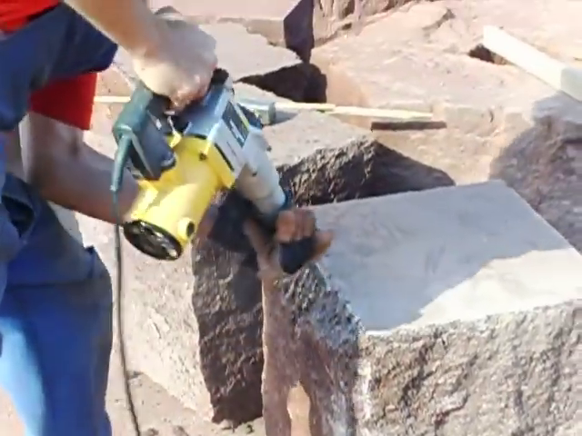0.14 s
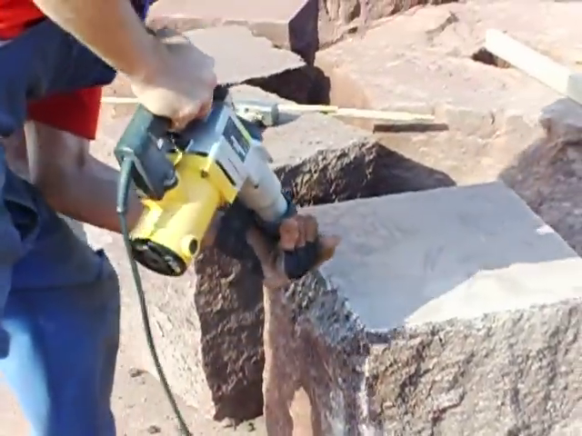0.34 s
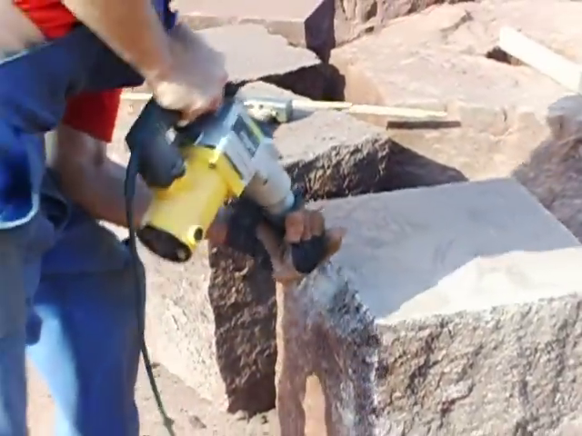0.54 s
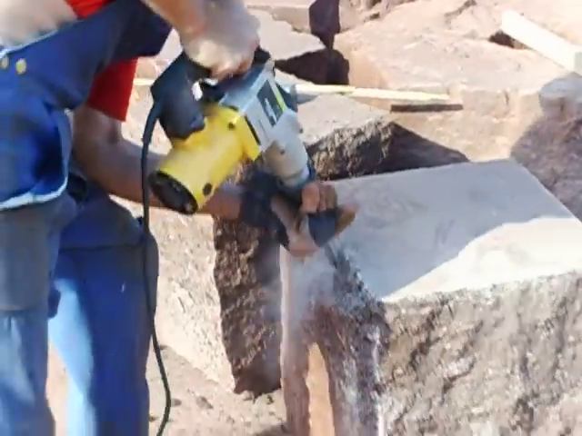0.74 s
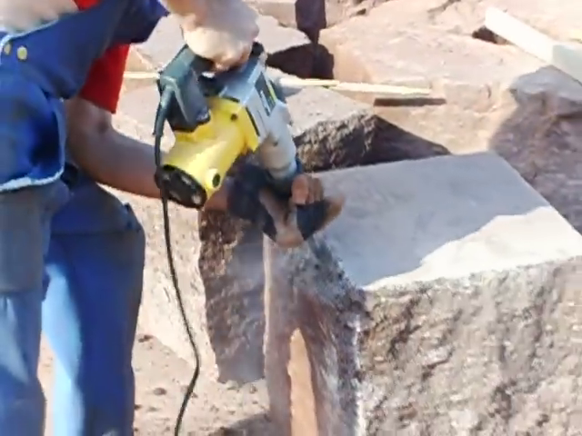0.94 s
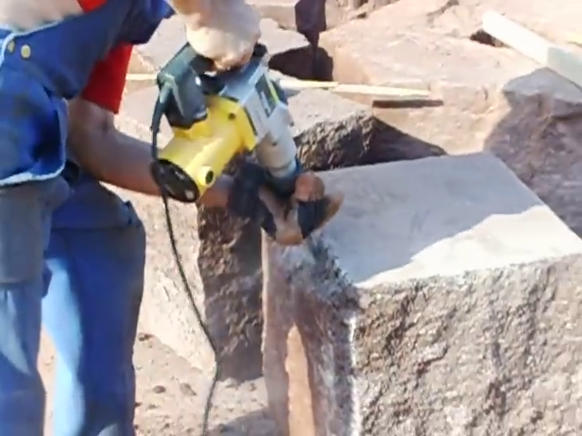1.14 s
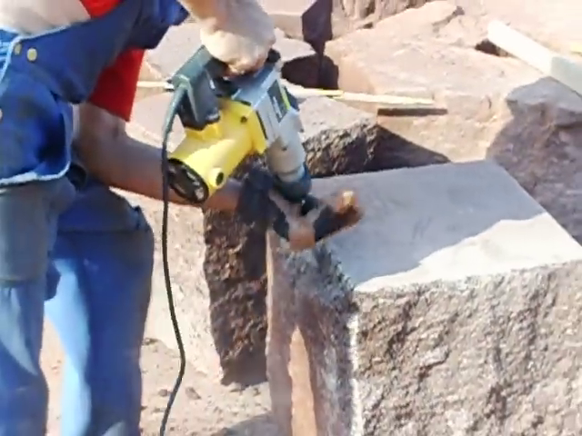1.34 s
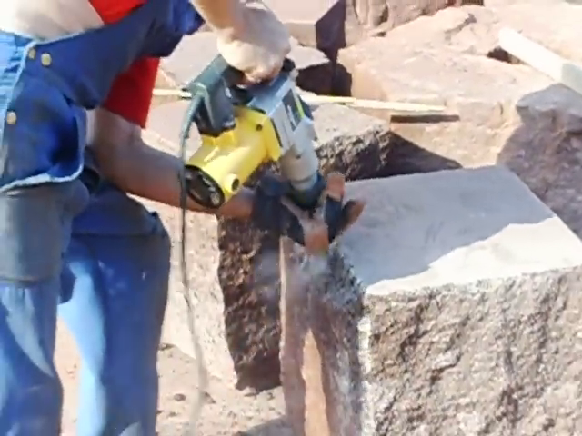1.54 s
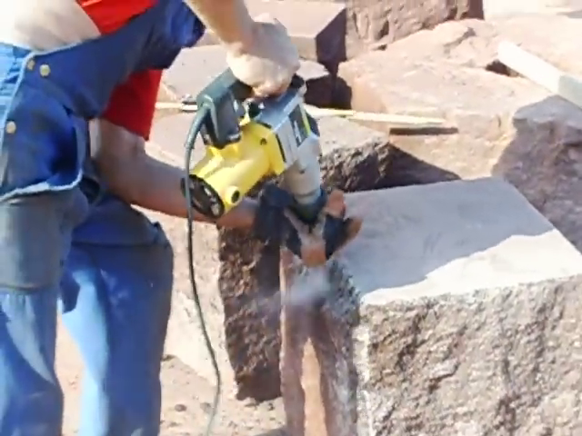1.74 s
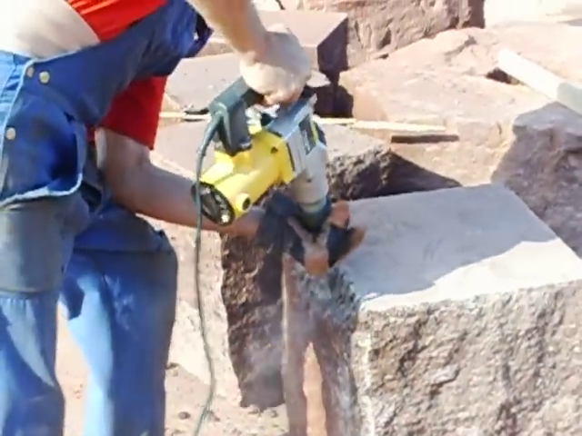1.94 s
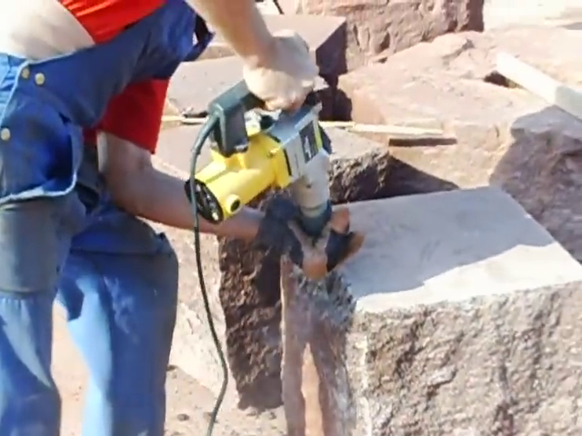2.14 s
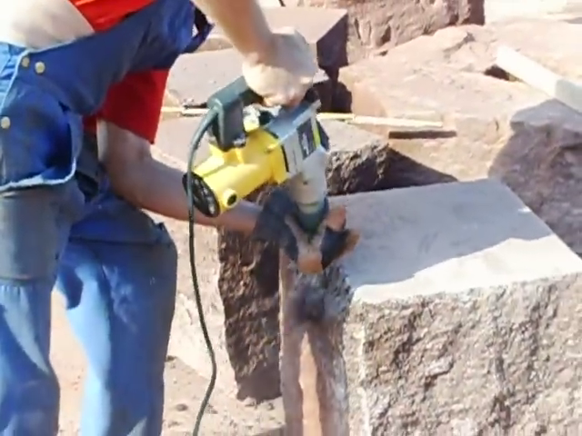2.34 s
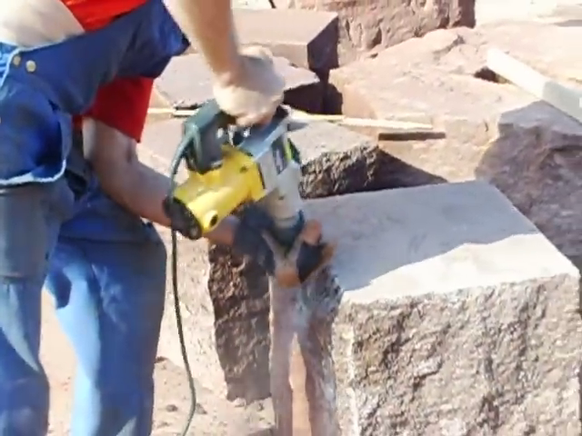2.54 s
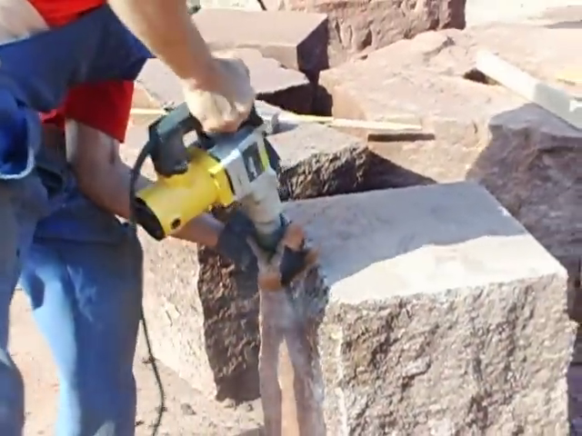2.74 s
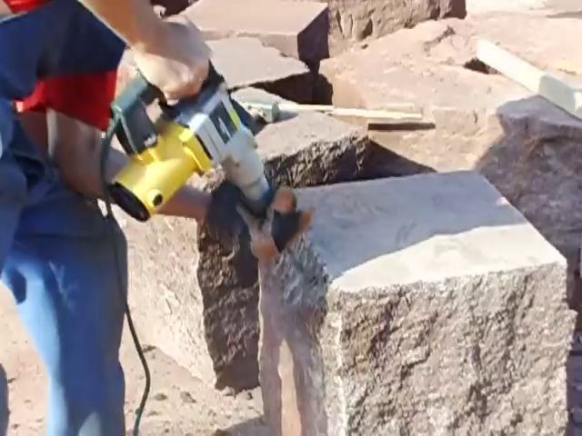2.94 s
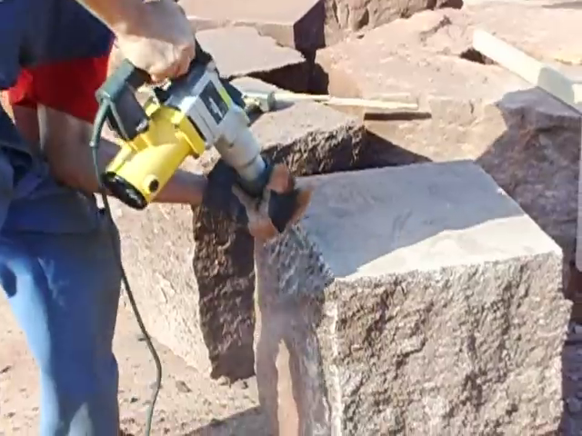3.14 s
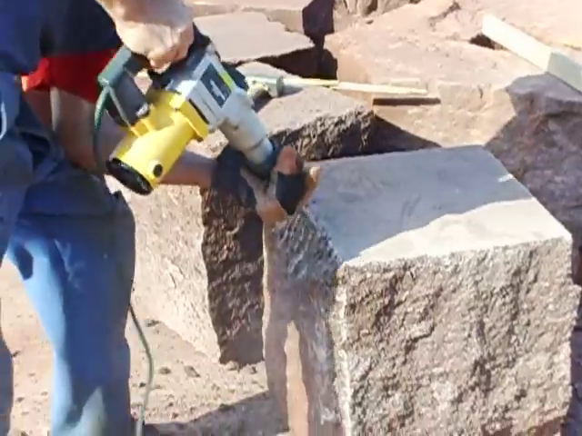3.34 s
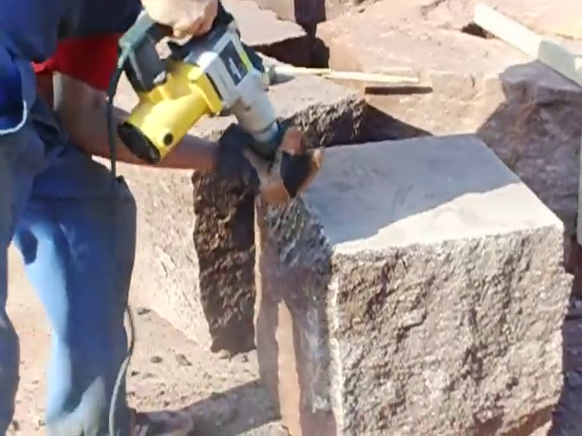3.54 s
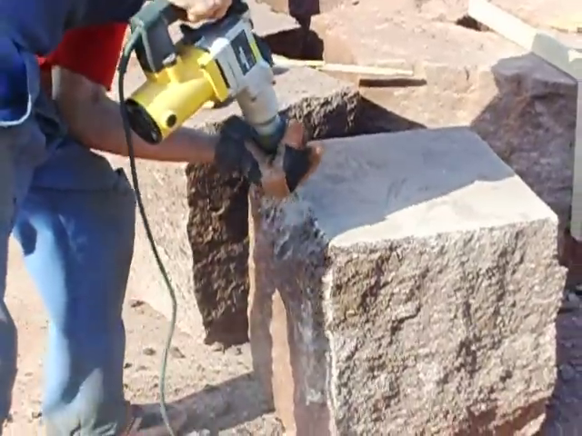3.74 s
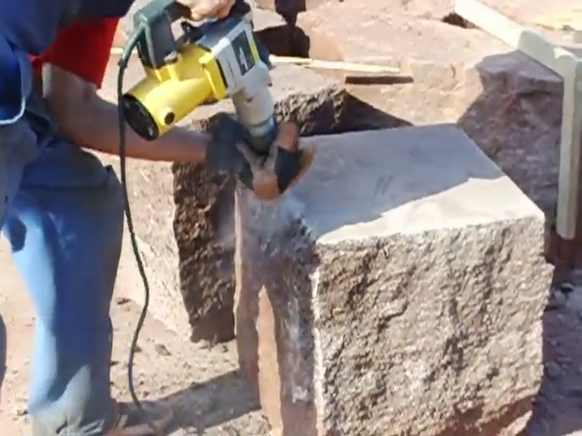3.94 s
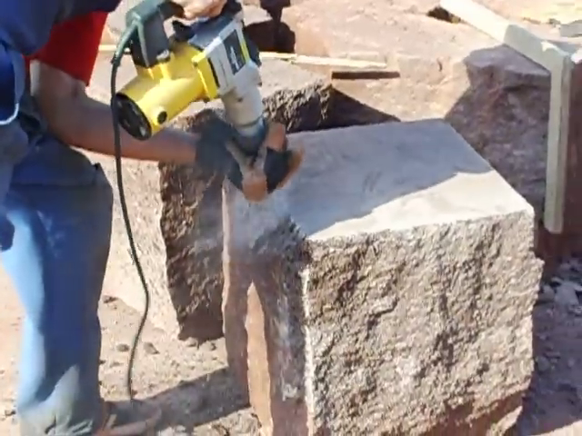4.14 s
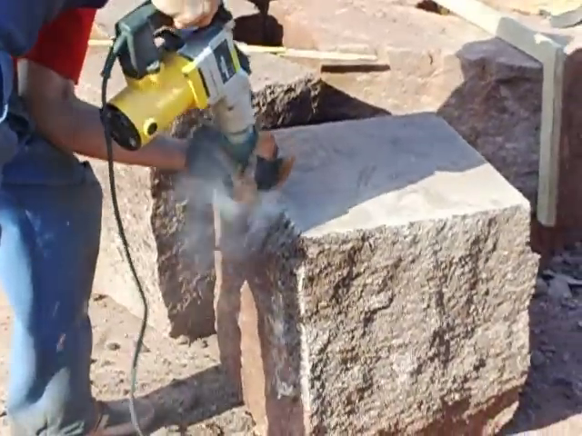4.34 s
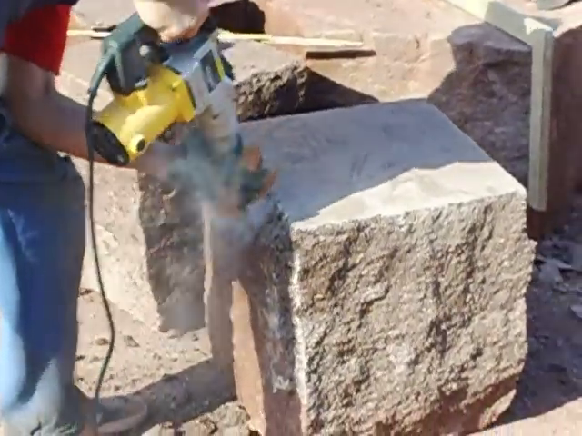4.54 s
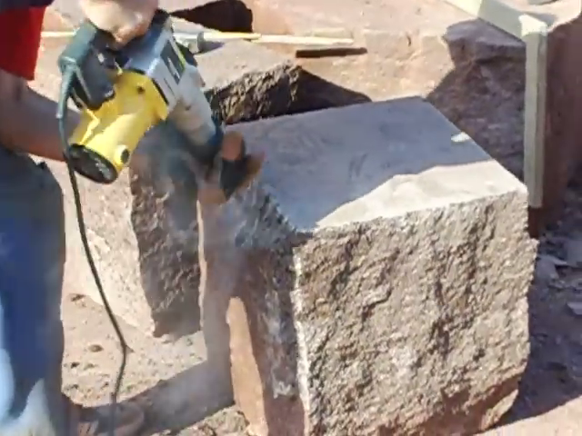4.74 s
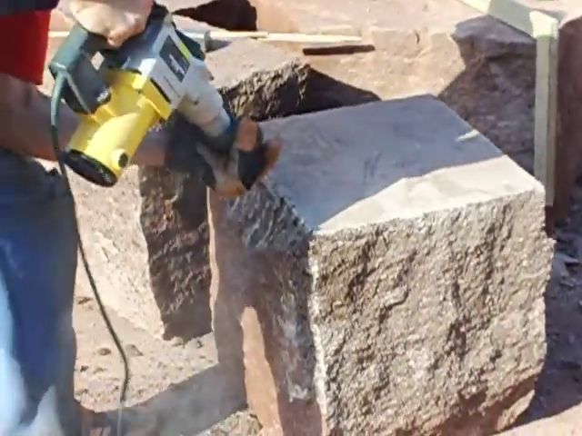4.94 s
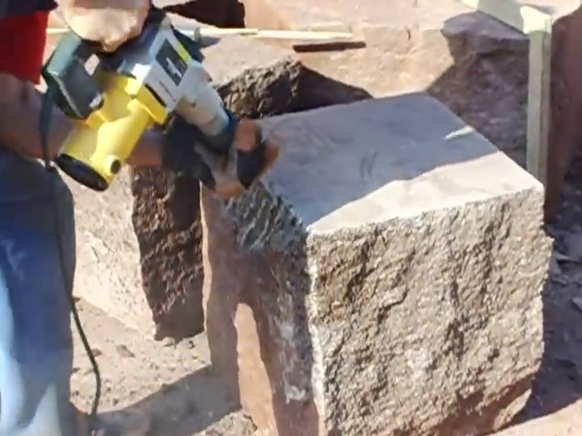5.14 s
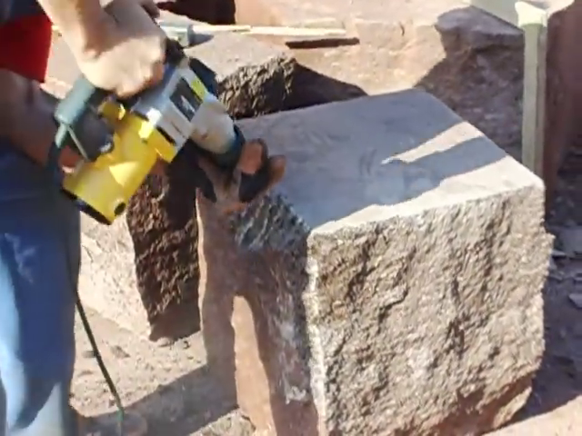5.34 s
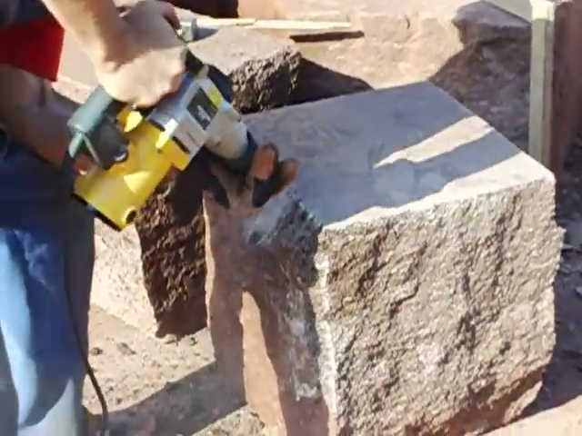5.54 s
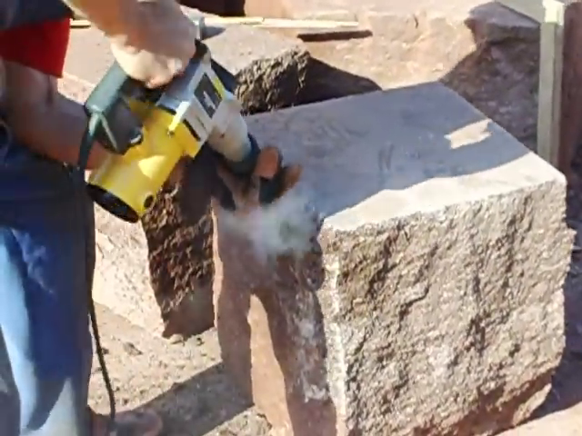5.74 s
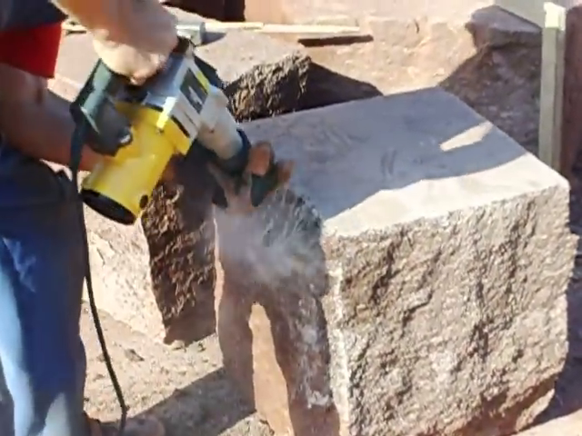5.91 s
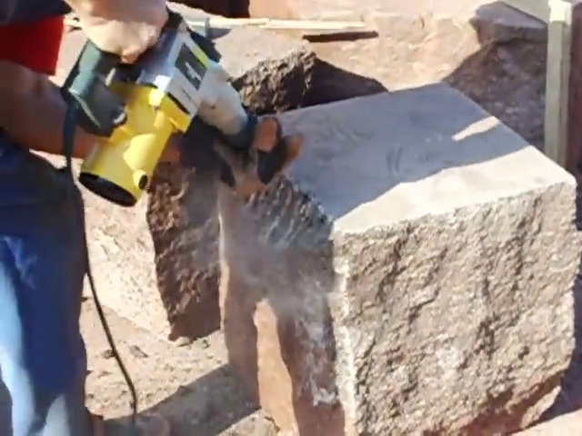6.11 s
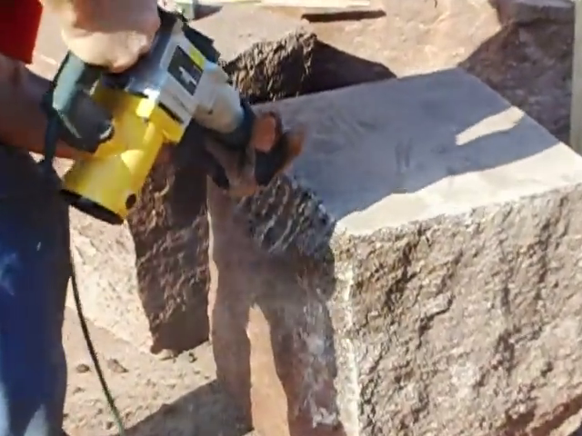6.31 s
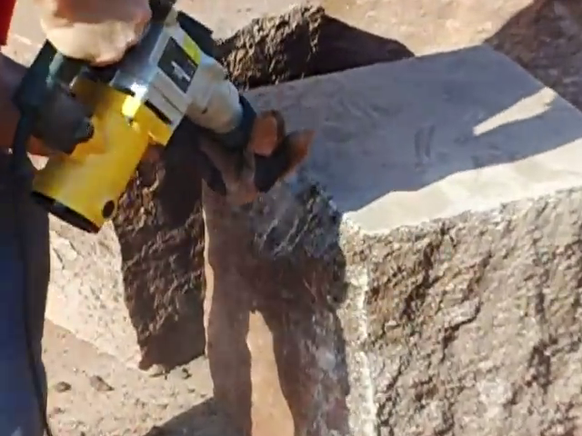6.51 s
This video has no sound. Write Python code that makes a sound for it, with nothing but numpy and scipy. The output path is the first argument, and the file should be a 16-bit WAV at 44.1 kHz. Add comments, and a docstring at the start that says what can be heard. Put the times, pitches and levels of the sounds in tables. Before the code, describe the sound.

Loud buzzing bursts of an electric chisel hammer pounding a stone block outdoors, alternating with the metallic rattle of its coasting motor.

```python
"""A loose chisel and gears rattle as the motor of a corded electric hammer winds down, close by.
Then the pointed chisel is driven into a stone block in four runs: the striker hits about 61 times
a second, the steel bounces and crushes grit, the housing shakes and a few flakes crack off.
Between runs the motor coasts and the rattle goes on. The blows overload the microphone.
Around it lies an open stone yard with a faint drone and a light breeze."""
import sys
import numpy as np
from scipy import signal
from scipy.fft import rfft, irfft, next_fast_len
from scipy.io import wavfile

SR = 44100
rng = np.random.default_rng(int(sys.argv[2]) if len(sys.argv) > 2 else 0)


def master(y):
    """Save y as 16-bit WAV."""
    cut = np.clip(np.atleast_2d(y).T, -1, 1)
    pcm = np.round(cut * 32767)  # scale
    wavfile.write(sys.argv[1], SR, pcm.astype(np.int16))


N = 289737
TIME = np.arange(N) / SR
PADDED = next_fast_len(N + SR // 4)
BINS_HZ = np.maximum(np.arange(PADDED // 2 + 1) * SR / PADDED, 1)
WORKING_SPEED = 61   # blows per second
MIC_TOP_HZ, RELEASE_S = 10970, .025


def from_db(db):
    """Decibels to gain."""
    return 10 ** (np.asarray(db) / 20)


def rms_one(x):
    """Scale to unit rms."""
    return x / np.sqrt(np.mean(x ** 2) + 1e-20)


def drift(rate):
    """A random wander of unit rms, with `rate` new values a second."""
    knots = rng.standard_normal(int(N / SR * rate) + 2)
    return rms_one(np.interp(TIME * rate, np.arange(len(knots)), knots))


def gate(start, end, attack_s, release_s):
    """Rise, hold at 1, fall."""
    return np.clip(np.minimum((TIME - start) / attack_s, (end - TIME) / release_s), 0, 1)


def swells(rows):
    """A bell-shaped rise in dB for each row."""
    return sum(db * np.exp(-((TIME - s) / half_s) ** 2) for s, half_s, db in rows)


def by_speed(speed, db_per_octave):
    """Gain of a part that gets louder with speed; 1 at working speed."""
    return from_db(db_per_octave * np.log2(speed / WORKING_SPEED))


def coloured(x, colour):
    """An EQ curve that runs in straight lines over log frequency."""
    hz, db = np.transpose(colour)
    gain = from_db(np.interp(np.log(BINS_HZ), np.log(hz), db))
    return irfft(rfft(x, PADDED) * gain, PADDED)[:N]


def ring(x, hz, width_hz):
    """One resonance with gain 1 at its peak."""
    r = np.exp(-np.pi * width_hz / SR)
    feedback = [1, -2 * r * np.cos(2 * np.pi * hz / SR), r * r]
    return signal.lfilter(np.array([1, 0, -1]) * (1 - r * r) / 2, feedback, x + 1e-18)


def clicks_at(times, sizes):
    """A train of single clicks."""
    return np.bincount(np.clip(np.round(times * SR).astype(int), 0, N - 1), sizes, N)


def crunch(clicks, decay_s):
    """Each click becomes a short dying burst of noise with the same energy."""
    r = np.exp(-2 / (decay_s * SR))
    energy = signal.lfilter([1 - r], [1, -r], clicks ** 2 + 1e-18)
    return np.sqrt(energy) * rng.standard_normal(N)


def along_steel(x, lag_s):
    """Bending waves turn a click into a falling chirp: top first, two octaves lower lag_s later."""
    cycles = lag_s * (2 * np.sqrt(BINS_HZ * MIC_TOP_HZ) - BINS_HZ)
    return irfft(rfft(x, PADDED) * np.exp(-2j * np.pi * cycles), PADDED)[:N]


# Power to the motor. Each row: on and off in seconds, target speed in blows per second.
# In the second row the pressure eases and the motor races.
POWER_ON = [(.445, 2.529, 61.06), (2.529, 2.721, 67.63), (3.6006, 4.4776, 61.14), (5.3353, 5.768, 60.45)]

def crank_speed(first_speed=54.06, spin_up_s=.1489, coast_s=1.7555):
    """Blows per second: the motor runs up quickly under power and coasts down slowly without it."""
    speed = first_speed * np.exp(-TIME / coast_s)
    for on, off, target in POWER_ON:
        powered_s = np.clip(TIME, on, off) - on
        driven = target + (np.interp(on, TIME, speed) - target) * np.exp(-powered_s / spin_up_s)
        coasting = np.exp(-np.maximum(TIME - off, 0) / coast_s)
        speed = np.where(TIME > on, driven * coasting, speed)
    return speed


# The bright, metallic EQ of the clatter. Each row: frequency in Hz, gain in dB.
RATTLE_EQ = [(60, -15.5), (200, -21), (470, -23), (570, -17), (720, -5.5), (950, -13.5), (1350, -9),
             (1850, -1), (2250, -1.5), (3300, 0.5), (4500, -1.5), (6000, -7), (8500, -13.5), (11000, -20)]
# Narrow rings that come and go as the chisel shifts in its holder.
# Each row: pitch in Hz, width in Hz, relative level in dB.
SHIFTING_RINGS = [(1804, 150, -17), (2513, 73, -12.5), (3620, 70, -10.5), (3860, 45, -10)]
# The low and the high ring of the loose chisel. Each row: pitch in Hz, width in Hz.
LOOSE_RINGS = [(2700, 80), (3800, 280)]
# The chisel hangs loose. Each row: start and end in seconds, then trims in dB
# for the clatter, the low ring and the high ring before it fades.
IDLES = [(-.02, .52, -0.5, -24.5, -15), (2.546, 3.624, 0, -28.5, -21), (4.65, 5.42, -0.75, -26, -18.5),
         (5.842, 6.2, 0.5, -23, -26)]
# The chisel shifts and rings out, loose or pressed.
# Each row: centre in seconds, half length in seconds, boost in dB.
RING_SURGES = [(.85, 0.086, 5.5), (1.08, .05, 9.5), (1.77, .08, 9), (2.56, 0.046, 6.5), (3.12, .06, 6),
               (3.35, 0.089, 13), (4.42, 0.018, 7.5), (4.88, 0.094, 4.5), (5.79, .05, 5.5)]

def rattle(turns, speed, touches_per_turn=26, clatter_db=-15.5, shifting_db=-22.5, fade_db_per_s=17):
    """Gears and the loose chisel touch many times a turn, over the rush of the cooling fan."""
    touches = (rng.random(N) < touches_per_turn * speed / SR) * rng.choice([-1, 1], N)
    clicks = touches * from_db(3 * np.clip(rng.standard_normal(N), -2, 2))
    fan = from_db(-1) * rng.standard_normal(N)
    contact = rms_one(along_steel(clicks, lag_s=.0009)) + fan
    # touches bunch up with the crank and by chance
    contact *= from_db(1.18 * np.sin(2 * np.pi * turns) + 1.09 * drift(110))
    # slower touches are softer and lose treble
    soft = signal.sosfiltfilt(signal.butter(2, 5500, fs=SR, output="sos"), contact)
    contact = soft + (contact - soft) * from_db(4 * np.log(speed / speed.mean()))
    out = from_db(clatter_db) * rms_one(coloured(contact, RATTLE_EQ))
    for hz, width, db in SHIFTING_RINGS:
        waver_db = 5 * np.minimum(drift(9), 1)
        out += from_db(shifting_db + db + waver_db) * rms_one(ring(contact, hz, width))
    out *= by_speed(speed, db_per_octave=1.5)
    # off the stone the chisel rings freely; its high ring fades through each pause
    low, high = [rms_one(ring(contact, hz, width)) for hz, width in LOOSE_RINGS]
    for start, end, trim_db, low_db, high_db in IDLES:
        loose = gate(start, end, attack_s=.03, release_s=.03)
        fade_db = fade_db_per_s * np.maximum(TIME - start, 0)
        low_ring = from_db(low_db - 2) * low
        high_ring = from_db(high_db - 4 - fade_db + swells(RING_SURGES)) * high
        out = out * from_db(trim_db * loose) + loose * (low_ring + high_ring)
    return out


def rotor(turns, speed, gear_ratio=5.4, level_db=-38.5, loaded_db=-1.5):
    """The geared rotor sings above the crank, louder at speed and a little softer under load."""
    load = sum(gate(start, end, attack_s, RELEASE_S) for start, end, attack_s, *_ in RUNS)
    level = from_db(level_db + loaded_db * load - 3 * drift(16)) * by_speed(speed, db_per_octave=26.5)
    return np.sqrt(2) * level * np.sin(2 * np.pi * gear_ratio * turns)


# A steady bed of tones in the yard. Each row: pitch in Hz, level in dB.
DRONE_TONES = [(172, -55), (441, -68)]

def drone():
    """Faint tones that hold their pitch and waver in level."""
    return np.sqrt(2) * sum(from_db(db - 3.5 * drift(8)) * np.sin(2 * np.pi * hz * TIME)
                            for hz, db in DRONE_TONES)


# The bass-heavy EQ of the breeze. Each row: frequency in Hz, gain in dB.
WIND_EQ = [(15, -6.5), (35, -4), (70, -12), (150, -28.5), (400, -34)]
# Gusts. Each row: centre in seconds, half length in seconds, boost in dB.
GUSTS = [(.9, .2, 4), (1.9, .25, 7.5), (3.1, .1, 10), (3.95, .25, 4)]

def wind(level_db=-48):
    """A light breeze rumbles on the microphone."""
    return from_db(level_db + swells(GUSTS)) * rms_one(coloured(rng.standard_normal(N), WIND_EQ))


# Hard metal accents in the rattle. Each row: start in seconds, relative level in dB.
CLANKS = [(0.019, -4), (0.08, 0), (0.252, -6), (0.359, -2.5), (0.481, -1.5), (2.922, 2), (3.316, -3),
          (3.36, -6.5), (3.427, -5), (4.79, -11), (4.809, -3), (4.899, 2), (4.978, -7), (5.023, -4),
          (5.233, -5), (5.983, 2.5), (6.041, -4.5)]

def clanks(level_db=14.5):
    """Now and then the loose chisel knocks hard in its holder and rings."""
    starts, db = np.transpose(CLANKS)
    contact = crunch(clicks_at(starts, from_db(db + level_db)), decay_s=.0013)
    return coloured(contact, RATTLE_EQ) + sum(ring(contact, hz, width) for hz, width in LOOSE_RINGS)


# The chisel is pressed to the stone. Each row: start, end and attack in seconds, blow level in dB,
# stone knock trim in dB, hum trim in dB, hum build-up in seconds, third harmonic trim in dB.
RUNS = [(.49, 2.56, 0.047, -8.5, -20, -33.5, .45, -46), (2.585, 2.8, 0.032, -14, -17, -37, 0.12, -57),
        (3.555, 4.66, 0.15, -8.5, -19.5, -38, 0.071, -42.5),
        (5.415, 5.855, 0.046, -8.5, -16.5, -46.5, .05, -34.5)]
# One strike and its bounces. Each row: delay in seconds, relative level in dB, jitter in seconds.
CONTACTS = [(0, 2.5, .000015), (.0024, -3, .0002), (.0052, -1.5, .00004), (.0073, -6, .0001),
            (.0092, -5, .0002)]
# The hard EQ of steel on stone. Each row: frequency in Hz, gain in dB.
BLOW_EQ = [(60, -11.5), (200, -7), (450, -20.5), (720, -5), (1000, -12.5), (1300, -7.5), (1650, 0),
           (2600, 0.5), (3500, 1.5), (4400, -2.5), (5500, -4.5), (7500, -9.5), (10500, -17.5)]
# The housing rings under a blow. Each row: pitch in Hz, width in Hz, gain in dB.
HOUSING_RINGS = [(683, 33, -7), (1250, 49, -20), (2080, 93, -5.5)]
# The seated tip has its own ring in each run. Each row: pitch in Hz, width in Hz, relative level in dB.
TIP_RINGS = [(1615, 180, -14), (1810, 190, -18), (1890, 550, -25.5), (2120, 1000, -11)]
# The tip digs in: the block knocks louder and the whole blow lifts a little.
# Each row: centre in seconds, half length in seconds, knock boost in dB.
BITES = [(2.33, 0.028, 6), (2.52, .04, 13.5), (2.69, .04, 5.5), (4.48, 0.073, 6), (5.8, .04, 6)]
STONE_RING, CHISEL_RING = (880, 340), (3936, 320)   # pitch and width in Hz

def blows(turns, speed, bounce_spread_db=2.2, seat_wander=.009, knock_db=-7.5, ring_db=-11.5):
    """One strike for each turn of the crank, harder at speed; the chisel bounces and crushes grit."""
    times = np.interp(np.arange(1, int(turns[-1])), turns, TIME)
    force_db = rng.standard_normal(len(times))
    clicks = np.zeros(N)
    for delay, db, jitter_s in CONTACTS:
        late, strong = rng.standard_normal((len(times), 2)).T
        seat = 1 + seat_wander * np.interp(times, TIME, drift(4))   # bounces shift as the tip digs in
        sizes = from_db(db + force_db + bounce_spread_db * strong * (delay > 0))
        clicks += clicks_at(times + delay * seat + jitter_s * late, sizes)
    # steel answers every blow alike and makes the buzz; grit is new each time and has little bass
    steel = along_steel(clicks, lag_s=.0011)
    low_cut = signal.butter(1, 1100, "high", fs=SR, output="sos")
    grit = signal.sosfilt(low_cut, crunch(clicks, decay_s=.0028))
    contact = steel + from_db(1) * grit
    housing = sum(from_db(db) * ring(steel, hz, width) for hz, width, db in HOUSING_RINGS)
    body = from_db(-1.1) * rms_one(coloured(contact, BLOW_EQ) + housing)
    stone = from_db(knock_db + swells(BITES)) * rms_one(ring(contact, *STONE_RING))
    chisel = from_db(ring_db + swells(RING_SURGES)) * rms_one(ring(grit, *CHISEL_RING))
    out = np.zeros(N)
    for (start, end, attack_s, run_db, stone_db, *_), (hz, width, db) in zip(RUNS, TIP_RINGS):
        pressed = gate(start, end, attack_s, RELEASE_S)
        tip = from_db(db) * rms_one(ring(steel, hz, width))
        out += from_db(run_db) * pressed * (body + tip + from_db(stone_db) * stone + chisel)
    return out * by_speed(speed, db_per_octave=9.5) * from_db(.096 * swells(BITES))


# Low housing tones and the steel's higher buzz. Each row: multiple of crank speed, relative level in dB.
CRANK_HARMONICS = [(1, -4.5), (2, 2.5), (4, -5), (5, -7), (6, 1.5), (8, -2), (9, 1), (12, -6), (15, -3),
                   (21, -2), (24, 3.5), (25, 0.5), (27, 3), (29, 2)]
# The machine is leant on and thumps harder.
# Each row: centre in seconds, half length in seconds, boost in dB.
LEANS = [(2.27, 0.071, 4), (3.67, 0.063, 5.5), (4.16, .06, 5)]

def crank_hum(turns, speed, idle_db=-60, idle_third_db=-61, ease_s=.311):
    """Tones locked to the crank: a low housing thump and hum, plus the higher buzz of the steel blows."""
    hum_level, third_level = from_db(idle_db), from_db(idle_third_db)
    for start, end, attack_s, _, _, hum_db, build_s, third_db in RUNS:
        hum_level += from_db(hum_db - 5) * gate(start, end, build_s, ease_s)
        third_level += from_db(third_db - 2) * gate(start, end, attack_s, RELEASE_S)
    angle = 2 * np.pi * turns
    # leaning raises the two lowest harmonics; the buzz above them needs speed
    thump, buzz = from_db(swells(LEANS)), by_speed(speed, db_per_octave=20)
    tones = sum(from_db(db) * (thump if multiple <= 2 else buzz) * np.sin(multiple * angle)
                for multiple, db in CRANK_HARMONICS)
    waver = from_db(1.3 * drift(14))
    return np.sqrt(2) * (hum_level * waver * tones + third_level * np.sin(3 * angle))


# Sharp cracks of stone. Each row: start in seconds, relative level in dB.
CHIPS = [(2.461, -6), (2.484, 2.5), (5.452, -1.5), (5.775, 0.5), (5.813, 4.5)]

def chips(level_db=20):
    """A flake cracks off with a bright snap and a knock from the block."""
    starts, db = np.transpose(CHIPS)
    crack = crunch(clicks_at(starts, from_db(db + level_db)), decay_s=.0025)
    snap = from_db(7) * ring(crack, hz=3200, width_hz=250)
    return coloured(crack, BLOW_EQ) + ring(crack, *STONE_RING) + snap


def yard(x, wet_db=-14, t60_s=.2, predelay_s=.0055):
    """Ground and stacked blocks scatter a short, thin tail."""
    t = TIME[:SR // 4]
    tail = rng.standard_normal(len(t)) * from_db(-60 * t / t60_s) * (t > predelay_s)
    return x + from_db(wet_db) * signal.fftconvolve(x, tail / np.linalg.norm(tail))[:N]


def scene():
    """One crank times the blows, rattle and hum; drone and breeze lie underneath, all in mono."""
    speed = crank_speed()
    turns = .453 + np.cumsum(speed) / SR   # the crank starts partway through a turn
    impacts = yard(blows(turns, speed) + chips() + rattle(turns, speed) + clanks())
    hum = crank_hum(turns, speed) + rotor(turns, speed)
    return (impacts + hum + drone() + wind())[None]


# A treble cut after the overload that softens its fizz. Each row: frequency in Hz, gain in dB.
OVERLOAD_TREBLE_CUT = [(9500, -1), (11000, -3), (12200, -12), (15500, -13.5)]

def record(dry, ceiling=.71, end_s=6.175, cutoff_hz=15900):
    """The top treble is cut and the blows overload the microphone; the sound stops abruptly."""
    dulled = signal.sosfilt(signal.butter(18, MIC_TOP_HZ, fs=SR, output="sos"), dry[0])
    overloaded = coloured(np.clip(dulled, -ceiling, ceiling), OVERLOAD_TREBLE_CUT)
    fade_out = np.clip((end_s - TIME) / .004, 0, 1)
    high_cut = signal.ellip(8, .05, 60, cutoff_hz, fs=SR, output="sos")
    return signal.sosfiltfilt(high_cut, overloaded * fade_out)[None]


dry = scene()
out = record(dry)
master(out)
```